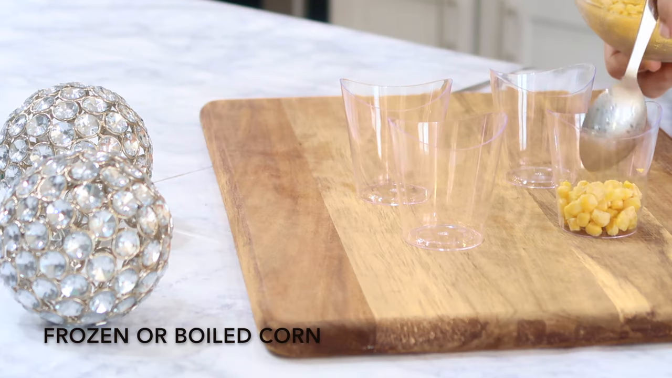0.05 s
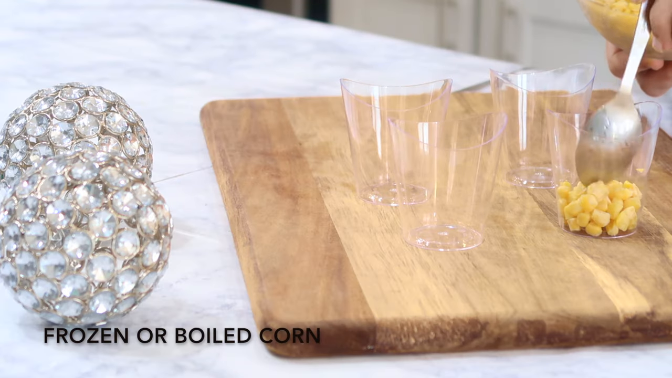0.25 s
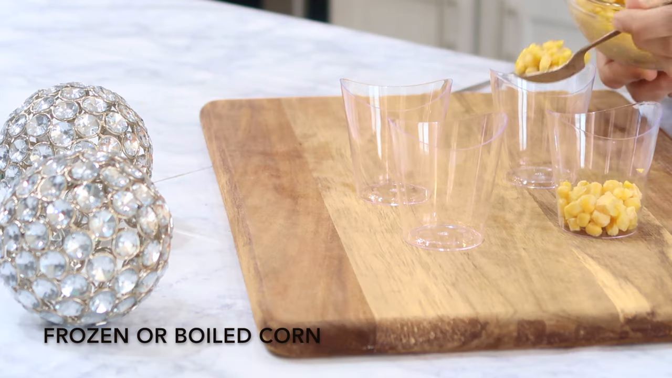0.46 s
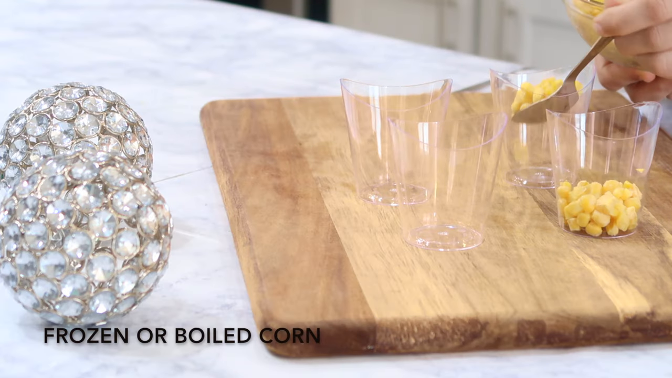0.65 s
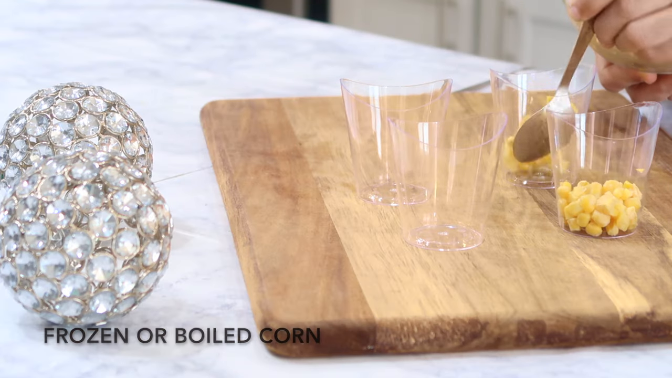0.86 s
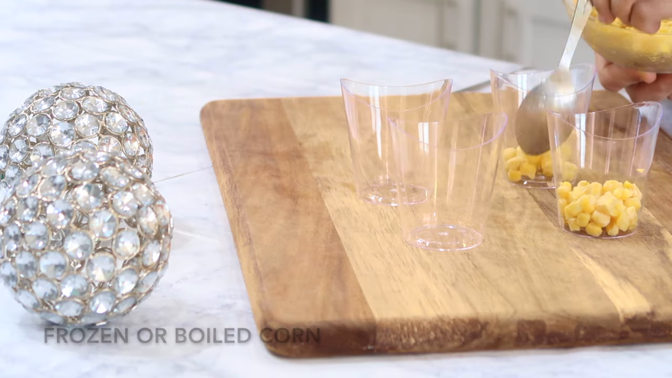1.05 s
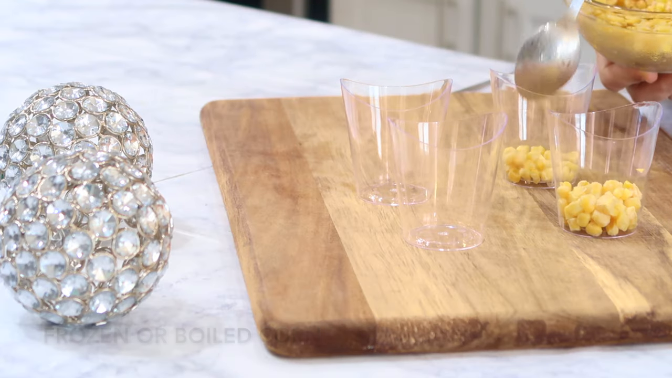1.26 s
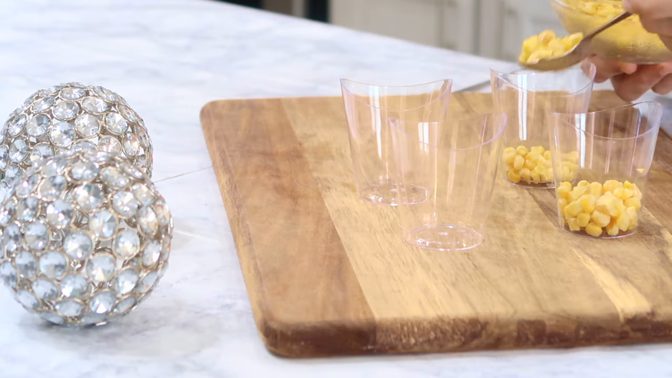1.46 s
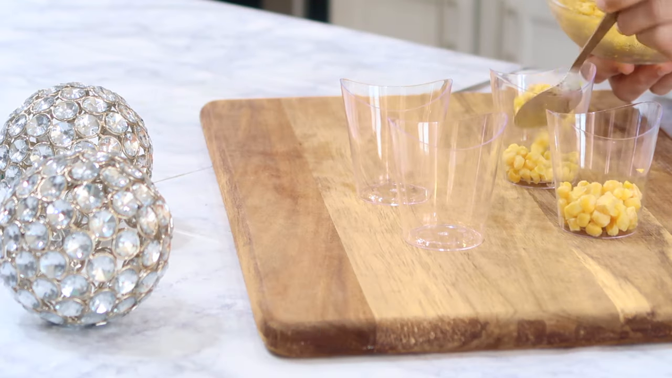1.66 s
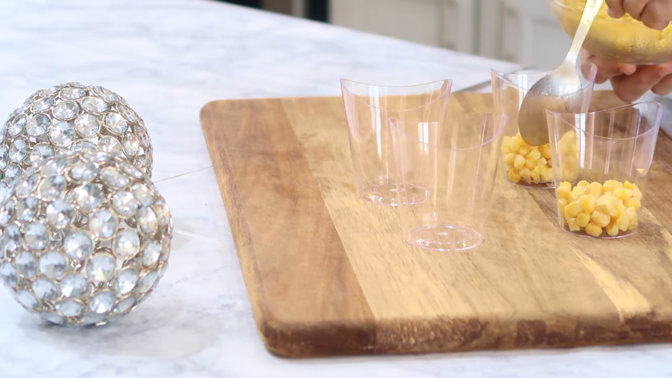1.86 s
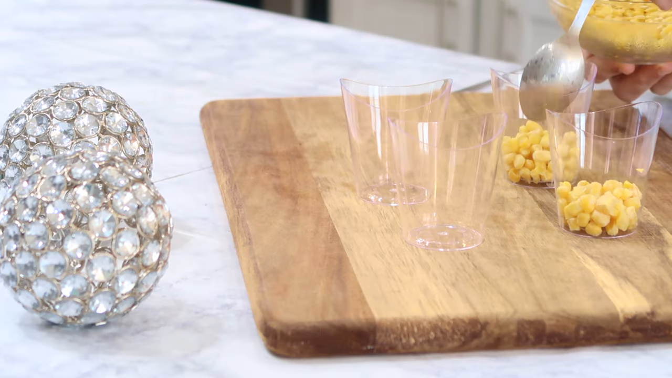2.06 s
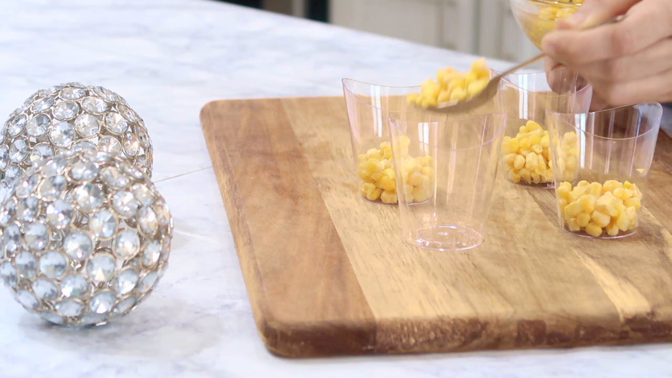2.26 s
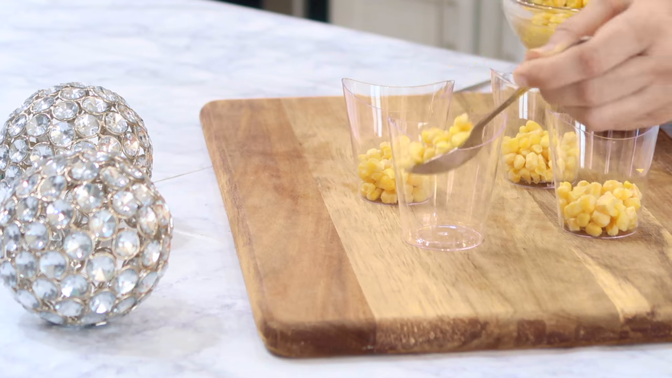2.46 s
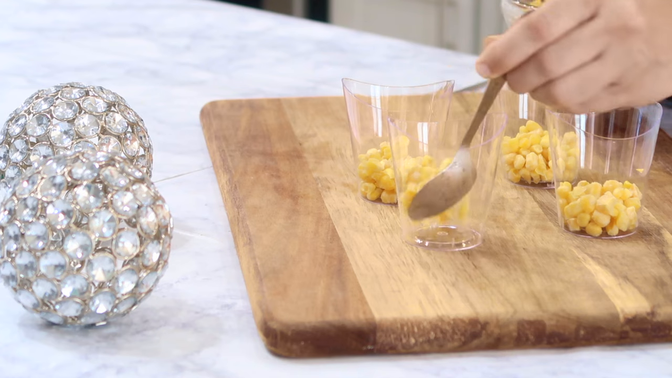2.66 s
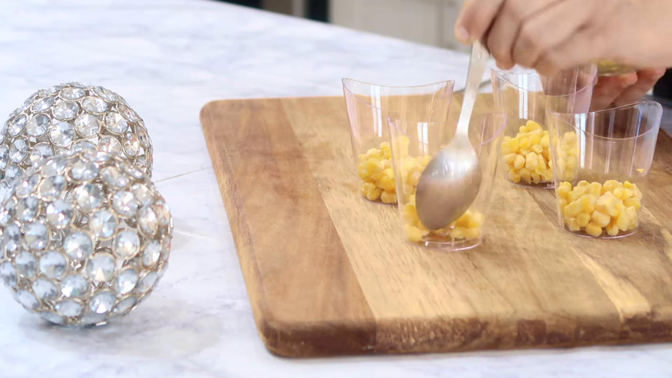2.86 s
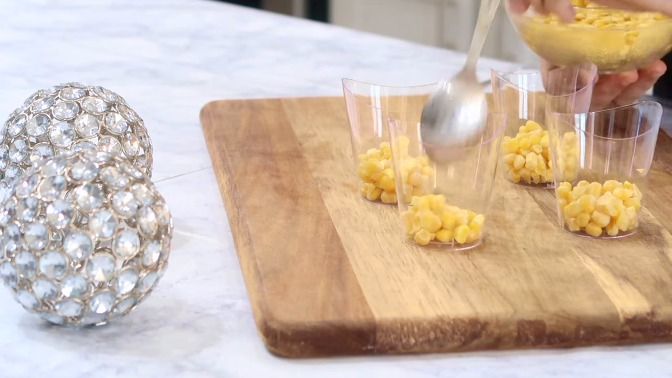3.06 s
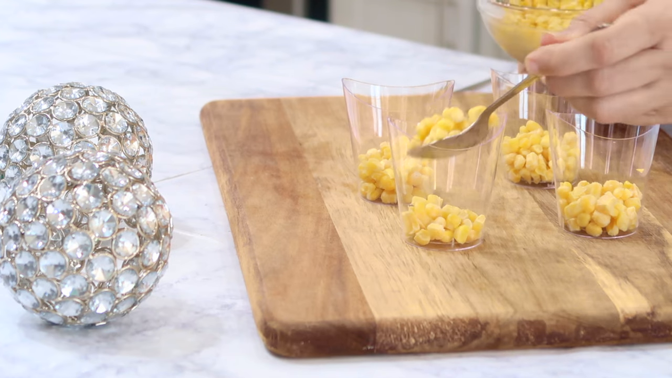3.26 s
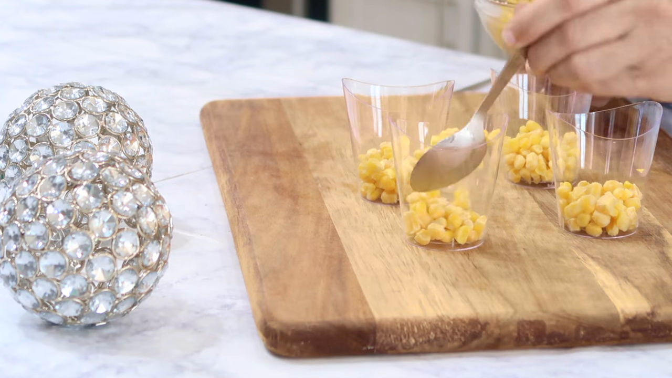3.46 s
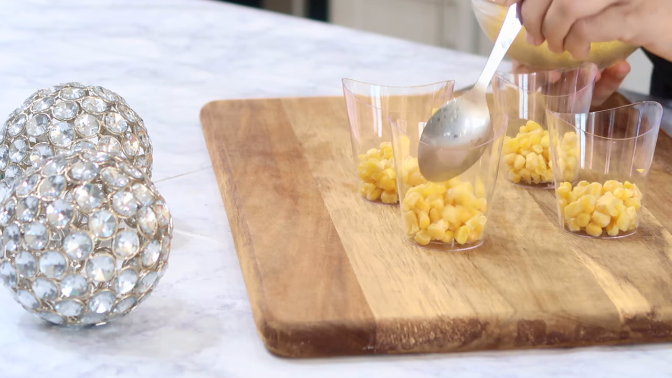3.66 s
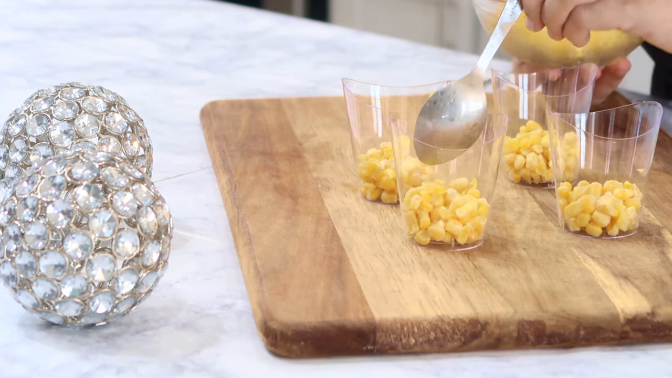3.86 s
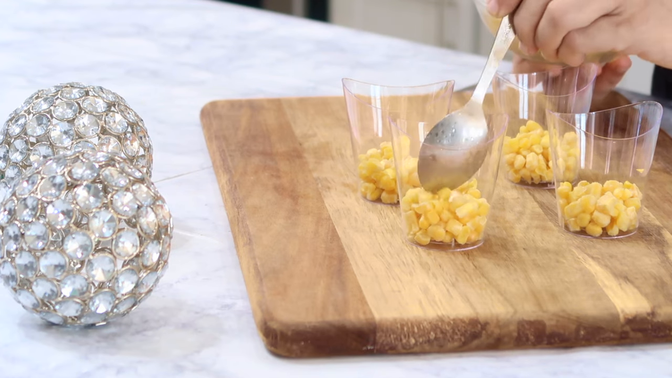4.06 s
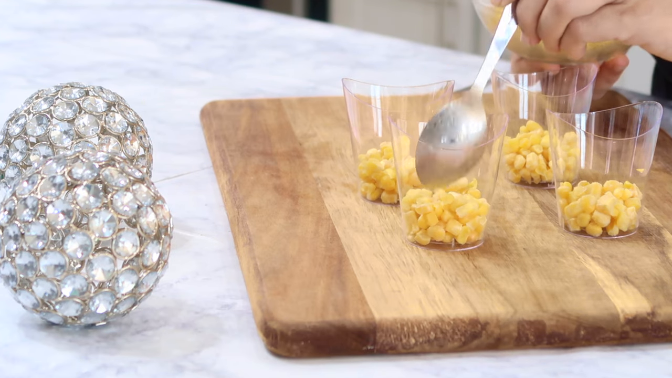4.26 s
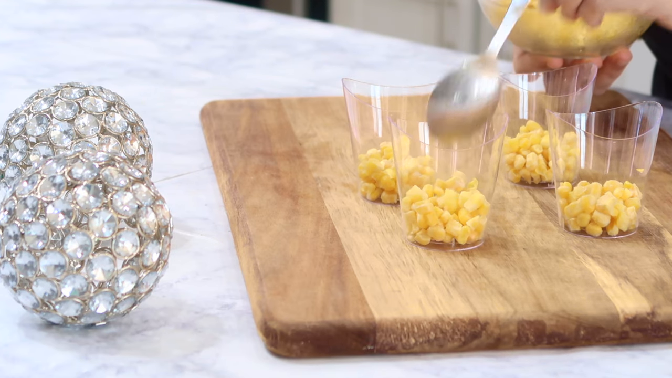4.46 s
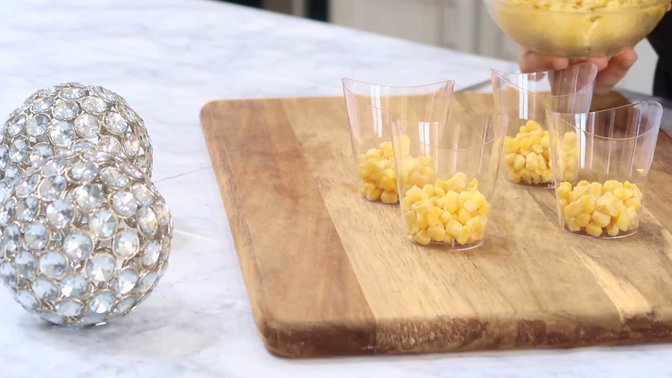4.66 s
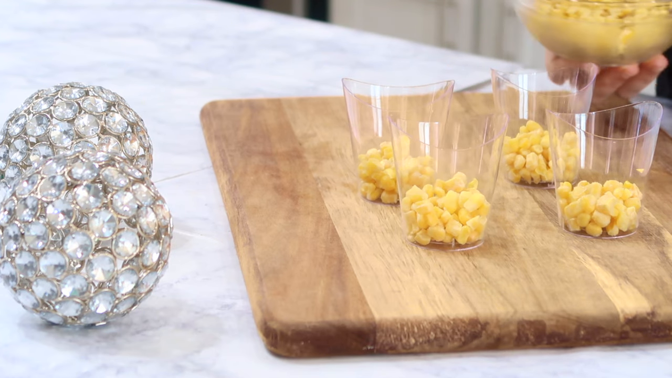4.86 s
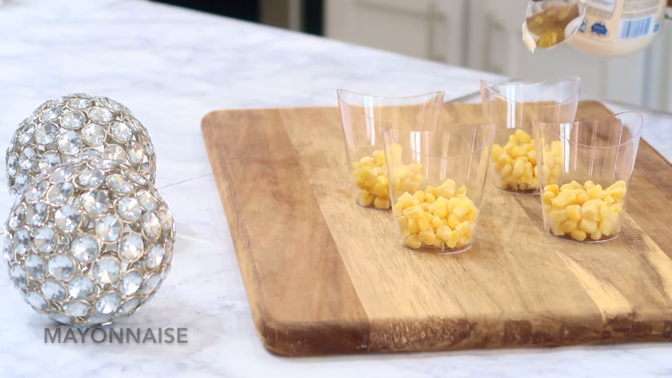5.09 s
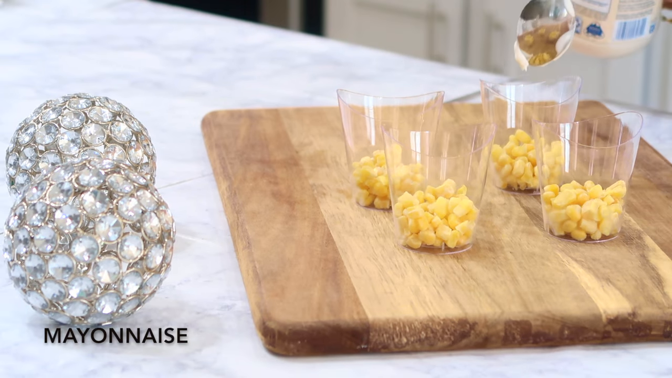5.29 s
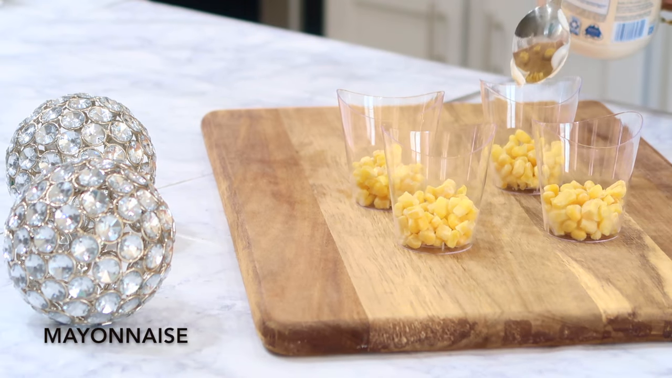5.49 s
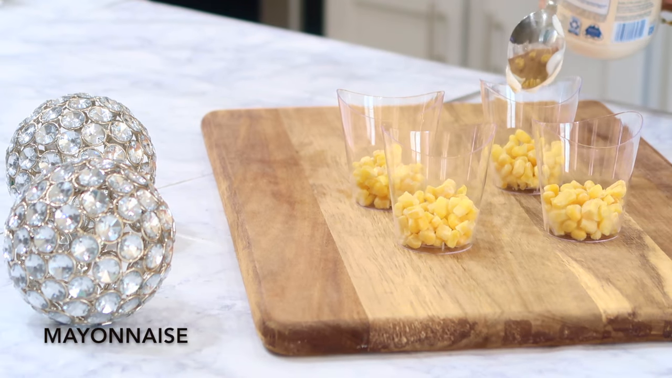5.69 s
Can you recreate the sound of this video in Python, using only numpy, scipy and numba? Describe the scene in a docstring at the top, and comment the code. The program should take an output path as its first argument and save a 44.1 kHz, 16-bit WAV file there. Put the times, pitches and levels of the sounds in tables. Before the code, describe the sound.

Close, dry stereo sound of a kitchen: corn drops into light plastic cups, the spoon knocking their sides, busiest around one second and just before three. Each cup rings briefly, duller as it fills. Soft hum and airy hiss lie beneath, with thin far bird whistles and faint chatter later. The corn stops at an edit, the room noise jumps up, and one clear bird sings until the end.

```python
"""Spoonfuls of corn kernels are tipped into thin plastic cups on a wooden board, in several edited shots;
kernels and spoon taps excite the resonances of air column, wall and rim, over kitchen noise, hum and a whine.
From 2.6 s far birds whistle as gliding sines in the middle of the image, then a distant chatter joins them.
Near 4.95 s the corn is cut off, the kitchen becomes louder, and a near bird sings slurs and a trill."""
import sys
import numpy as np
from scipy import signal
from scipy.fft import rfft, irfft
from scipy.io import wavfile
from scipy.ndimage import uniform_filter1d
from numba import njit

SR = 44100
rng = np.random.default_rng(int(sys.argv[2]) if len(sys.argv) > 2 else 0)


def generate_wav(sig):
    """Save sig (samples, or channels by samples) to the path in sys.argv[1] as 16-bit PCM at SR."""
    pcm = np.round(np.clip(np.atleast_2d(sig).T, -1, 1) * 32767).astype(np.int16)
    wavfile.write(sys.argv[1], SR, pcm)


def linear_from_db(decibels):
    """Turn decibels (scalar or array-like) into linear amplitude factors; 0 gives 1."""
    return 10 ** (np.asarray(decibels, float) / 20)


N = 252693
T = np.arange(N) / SR

# Levels in dB are relative drives: filters, gains and rooms further on still change them.

# Modes of a cup. Each row: pitch in Hz, width in Hz before damping by the corn, level in dB.
# The first is the air column, whose pitch each spoonful sets anew.
CUP_MODES = [(1170, 45, 0), (2420, 150, -11), (2890, 70, -10), (3290, 65, 2), (5280, 60, -6),
             (6420, 90, -7), (7460, 130, -13), (8200, 150, -15)]
# Spoonfuls. Each row: air column in Hz before and after filling, rim ring in Hz, damping by the corn as a factor.
SPOONFULS = [(1240, 1250, 4830, 1.3), (1095, 1290, 4950, 1), (1160, 1290, 4830, 2.8),
             (1150, 1250, 4740, 1.4), (1140, 1290, 5870, 2.3)]
# How freely sliding corn rings each cup. Each row: air column in dB, rim in dB.
SPOONFUL_DB = [(-2, -8.5), (-2, -2), (-1, -12.5), (-1.5, 2), (-4.5, -9)]
# The four parts: air column, wall, rim, tick. Each row: from in Hz, to in Hz, broad rattle between modes in dB.
PARTS = [(650, 1900, -21), (1500, 4400, -14.5), (4400, 6100, -19), (6100, 11500, -20)]
# Push of a tap. Entries: air column in dB, wall in dB, rim in dB, tick in dB.
BLOW_DB = [18.2, 12.3, 15.8, 15]
ENDS_S = [.63, 1.425, 2.62, 3.16, 4.95]  # ends of the spoonfuls; those at 1.425, 3.16 and 4.95 are edits

# Slides of kernels off the spoon. Each row: start in seconds, rise in seconds, peak in dB,
# fade in dB per second, treble against the wall in dB.
SLIDES = [(0, 0.0011, -61, 96, 7.5), (.66, 0.08, -76, 14, -18), (.845, 0.013, -48.5, 250, -22),
          (.885, 0.062, -47.5, 77, -0.5), (.97, 0.026, -53.5, 58.5, -8), (1.68, 0.046, -59.5, 63, 0),
          (2.649, 0.0036, -59.5, 300, -13), (2.679, 0.052, -47.5, 43, -16), (3.449, 0.0086, -58.5, 54, -3),
          (3.58, 0.032, -67, 40, 6), (4.205, 0.0058, -61.5, 303, -11)]
AIR_DB, AIR_GROWTH = -54.5, 0.54  # air column under a -50 dB slide; dB gained per dB of slide
RIM_DB, RIM_GROWTH = -10, 3.2  # rim against the flow in a -46 dB slide; dB gained per dB of slide
RIM_FADE_S = 0.13  # time constant of the rim drive, fading as the spoon sinks in
KERNEL_S = .0008  # time constant of a kernel's contact
PATCHY_DB, PATCHY_PER_S = 2, 90  # kernels come in clumps, anew for each part of the cup
FILL_S = 0.4  # from the first slide until the heap is built
WANDER, WANDER_PER_S = .006, 45  # detuning per unit of damping and heap growth; changes a second
BROAD_GROWTH = 0.2  # exponent by which the broad rattle grows with the heap

# Kernels on the bottom, ringing the air column. Each row: time in seconds, level in dB, tick in dB.
PLOPS = [(.0435, -47, -30), (.6942, -54, -25), (.702, -55, -30), (.712, -57, -25), (.7376, -45.5, -27),
         (.7705, -47, -30), (.775, -44, -24), (.796, -51, -30), (.875, -46, -30), (1.7463, -48.5, -2),
         (2.675, -29.5, -30), (2.7391, -31, -30), (2.7141, -36, -30), (2.808, -40, -30), (3.3658, -47, -35),
         (3.374, -52, -35), (3.404, -52, -35), (3.454, -51.5, 5), (3.468, -44, -25), (3.49, -38.5, -19),
         (3.679, -49.5, -19), (1.927, -54, -20)]
# Spoon on the rim. Each row: time in seconds, level in dB, tick in dB.
CLINKS = [(.778, -55, -25), (.9097, -34.5, -26), (2.7141, -49, -25), (2.745, -50, -21), (2.76, -50, -25),
          (.8485, -32.5, -15), (.8573, -35, -20), (.9265, -35, 4), (.9345, -37, 1), (.968, -38, -15),
          (.9901, -39.5, 7.5), (2.675, -30.5, -23), (2.6833, -34, -22), (2.7391, -31, -15),
          (3.0144, -43, 1.5), (3.5803, -42, 2.5)]
# Knocks on the wall. Each row: time in seconds, level in dB, tick in dB.
KNOCKS = [(.0937, -63, 15), (.6577, -48.5, -1), (.831, -44, -21), (.9035, -31.5, -30), (1.0135, -30, -20),
          (.951, -36, -15), (1.006, -36, -20), (1.054, -33, -10), (1.066, -38, -20), (1.2194, -36, -6.5),
          (1.6691, -50.5, -3), (1.6962, -47, -4), (1.708, -39, -5), (1.8333, -40, -10), (1.897, -47.5, -10),
          (2.6525, -40.5, -2.5), (2.7465, -26.5, -5.5), (2.928, -48, 2), (2.9503, -45, 2.5),
          (3.0344, -36.5, -27), (3.4592, -47, -16), (3.4983, -41.5, -28), (3.6085, -39, -8),
          (3.619, -41, -19), (3.7471, -35, -10), (3.7425, -42, -4), (3.756, -54.5, 14), (3.774, -44, -4),
          (3.781, -46, -13), (3.626, -38.5, -9), (3.68, -48, -20), (4.2112, -48, -20), (4.385, -63, 10.5),
          (.737, -53, -20), (.749, -46, -11), (.765, -56, -25), (.79, -57, -25), (1.0215, -30, -20),
          (1.717, -49, 0), (1.726, -48, -15), (2.6323, -56, -25), (2.7211, -40, -24), (2.753, -38, -4),
          (2.778, -33, -22), (2.858, -37, -22), (2.9965, -51, -14), (3.022, -46, -5), (3.044, -42, -20),
          (3.0708, -50, -15), (3.4905, -37, -17)]
# Shares of the push: air column in dB, wall in dB, rim in dB.
PLOP_DB, CLINK_DB, KNOCK_DB = (2, -8, -28), (-11, 3.2, 1), (-17.5, -0.4, -12.5)
BOUNCE_S = .0004, .0011  # a tap lands twice, edge then bowl: shortest and longest gap

# Spectrum of the kitchen air. Each row: frequency in Hz, relative density in dB per Hz.
KITCHEN_SPECTRUM = [(20, -23), (45, -14), (95, -7), (150, -11), (420, -12.5), (700, -20.5), (1250, -26.5),
                    (2700, -30.5), (9200, -45.5), (13000, -49.5), (15000, -40.5)]
# Likeness of left and right. Each row: frequency in Hz, correlation from 0 to 1.
LIKENESS = [(60, 1), (130, 0.83), (290, 0.46), (640, 0.48), (1410, 0.06), (3100, 0.19), (6820, 0.19),
            (15000, 0.037)]
# Hum lines. Each row: frequency in Hz, width of the wavering in Hz, level in dB before the common gain.
HUM = [(58.3, 6.6, -72.5), (120.5, 2.7, -61), (181, 4.3, -70.5), (473, 7.3, -74), (518.4, 12, -75)]
KITCHEN_DB = -61  # before the common gain
WHINE_HZ, WHINE_DB, THROB_HZ = 13007, -87, 30.0  # level before throb and common gain
LAST_SHOT_S, LAST_SHOT_DB = 4.962, 10.5  # the background steps up here, by so much

# Dull thuds of the cup on the board. Each row: time in seconds, level in dB.
THUDS = [(.7368, -41), (0.72, -48), (.0435, -66)]
THUD_HZ, THUD_S = 912, 0.0021  # pitch; time constant of decay

# Far birds, plain glides. Each row: start in seconds, length in seconds, from in Hz, to in Hz, peak in dB.
GLIDES = [(2.573, 0.083, 3970, 4200, -77), (3.96, 0.041, 2960, 2830, -62),
          (3.991, 0.033, 2610, 2110, -59.5), (4.189, 0.046, 2920, 2840, -63),
          (4.261, 0.04, 2785, 2970, -57), (4.265, 0.052, 2690, 2560, -63),
          (4.306, 0.026, 2540, 2200, -60.5), (3.198, 0.043, 3450, 3520, -72.5),
          (3.228, 0.045, 5350, 5100, -75), (3.32, .05, 1950, 2230, -74), (3.422, 0.03, 4270, 4380, -75),
          (4.465, 0.032, 1886, 2010, -62.5), (4.511, 0.058, 2014, 1946, -62),
          (4.82, 0.024, 2040, 2480, -64), (5.609, 0.095, 3720, 4730, -65), (5.695, 0.023, 3650, 3000, -63)]
# A far falling buzz. Its row: start in seconds, length in seconds, from in Hz, to in Hz, level in dB before the buzz.
SQUEAK = (3.24, 0.09, 4750, 2750, -68)
BUZZ_HZ, STUTTER_HZ = 520, 98
# Notes up and over. Each row: start in seconds, length in seconds, share at the top, top in Hz, peak in dB.
ARCHES = [(4.302, 0.12, 0.28, 3540, -65), (4.84, 0.11, 0.68, 3720, -65.5), (4.843, 0.102, .66, 5580, -77)]
ARCH_RISE, ARCH_FALL = .35, 0.27  # bend of the climb; share of pitch lost after the top
# Quick falls. Each row: start in seconds, first pitch in Hz, peak in dB.
CHIRPS = [(4.586, 2354, -61), (4.615, 2300, -59.5), (4.645, 2256, -57.5), (4.672, 2202, -60),
          (4.699, 2250, -62), (4.79, 2514, -58.5)]
CHIRP_S, CHIRP_FALL = 0.022, .72  # length; last pitch over first
FLUTTER_DB, FLUTTER_PER_S = 5, 85  # moving air and leaves break up the far whistles
NEAR_SWELL, FAR_SWELL, TRILL_SWELL = 0.74, 0.16, 0.27  # roundness of the swell, 0 = flat
LOUDEST = 0.63  # share of a note at its level peak

# Far chatter and its echoes. Each row: time in seconds, level in dB.
CHATTER_LEVEL = [(3.28, -76), (3.5, -71.5), (4.95, -68), (4.97, -66.5), (5.73, -65)]

# Near bird, notes that hold and then slide. Each row: start in seconds, length in seconds,
# from in Hz, to in Hz, peak in dB.
SLURS = [(4.946, 0.061, 2910, 2067, -35), (5.258, 0.054, 1857, 1746, -29),
         (5.483, 0.071, 2775, 2070, -29.5), (5.545, .032, 2064, 2480, -41),
         (5.569, 0.069, 2500, 2300, -31.5)]
SLIDE_S = .045  # slide that ends a near note
THROAT_HZ, THROAT_WIDTH_HZ = 2480, 520  # the near bird's slurs carry best here
# Near bird's trill. Its row: start in seconds, length in seconds, pitch in Hz, peak in dB.
TRILL = (5.003, .125, 2061.5, -35)
# Upward flicks in the trill. Each row: time in seconds, height in Hz.
FLICKS = [(5.019, 830), (5.047, 248), (5.074, 462), (5.1, 30)]
FLICK_UP_S, FLICK_DOWN_S, FLICK_DB_PER_KHZ = 0.00922, 0.00684, -2
CREEP_S, CREEP_HZ = 0.0254, 129.7  # the trill creeps up before each flick


@njit
def svf(x, hz, width):
    """Resonance: a state-variable band-pass with moving centre and width, of gain 1 at the centre."""
    y, b, l = np.empty(len(x)), 0., 0.
    for i in range(len(x)):
        g, k = np.tan(np.pi * hz[i] / SR), width[i] / hz[i]
        v = (b + g * (x[i] - l)) / (1 + g * (g + k))
        b, l, y[i] = 2 * v - b, l + 2 * g * v, k * v
    return y


def unit(x):
    """Normalisation: scale to rms 1."""
    return x / np.sqrt(np.mean(x ** 2))


def band(x, lo_hz, hi_hz):
    """Band limitation: a Butterworth band-pass."""
    return signal.sosfilt(signal.butter(2, [lo_hz, hi_hz], "bandpass", fs=SR, output="sos"), x)


def room(x, t60, damp_hz):
    """Reverberation: exponentially decaying noise of near unit energy, independent left and right."""
    t = np.arange(SR) / SR
    decay = 1000 ** (-t / t60) * np.minimum(t / t60 / 0.053, 1)
    tail = band(rng.standard_normal((2, SR)), 250, damp_hz) * decay
    return signal.fftconvolve(x[None], tail / np.sqrt(np.sum(tail[0] ** 2)))[:, :len(x)]


def walk(per_s, count, size):
    """Random modulation: rows of linearly joined random levels, per_s new ones a second."""
    knots = rng.standard_normal((count, 500))
    return 0.98 * np.array([np.interp(np.arange(size) / SR * per_s, np.arange(500), row) for row in knots])


def slides(rows, t):
    """Granular flow: each slide swells, then thins out exponentially, driving the four parts of the cup."""
    flow, treble, rim = 0, 0, 0
    for s, rise, db, fade_db, treble_db in rows:
        one = ((t - s) / rise).clip(0, 1) ** 2 * linear_from_db(db - fade_db * np.maximum(t - s - rise, 0))
        flow = flow + one
        treble = treble + linear_from_db(treble_db) * one
        sinking = np.exp(-np.maximum(t - s, 0) / RIM_FADE_S)
        rim = rim + linear_from_db(RIM_DB + RIM_GROWTH * (db + 46)) * one * sinking
    air = linear_from_db(AIR_DB) * (flow / linear_from_db(-50)) ** AIR_GROWTH
    return np.array([air, flow, rim + linear_from_db(0.5) * treble, linear_from_db(-22.0) * treble])


def kernels(per_s, spread_db, colour_db, rustle):
    """Shot noise: chance impacts of unequal size, each shared anew among the parts, over a fine rustle."""
    size = linear_from_db(spread_db * np.minimum(rng.exponential(size=N), 3)) * (rng.random(N) < per_s / SR)
    colour = linear_from_db(colour_db * rng.standard_normal((4, N)).clip(-2, 2))
    clicks = size * colour * rng.choice([-1, 1], N)
    t = np.arange(130) / SR
    contact = rng.standard_normal(130) * np.exp(-t / KERNEL_S)
    clicks = signal.fftconvolve(clicks, [contact])[:, :N]
    return unit(unit(clicks) + rustle * rng.standard_normal(N))


def taps():
    """Impulsive excitation: a double blow on each part, then some milliseconds of decaying chatter."""
    sharp, rattle = np.zeros((4, N + 900)), np.zeros((4, N + 900))
    t = np.arange(900) / SR
    softness = np.array([[.55], [.6], [.55], [.3]])  # the push is softest in the treble
    for rows, shares_db in (PLOPS, PLOP_DB), (CLINKS, CLINK_DB), (KNOCKS, KNOCK_DB):
        bursts = rng.standard_normal((len(rows), 900)) * np.exp(-t / 0.0084) * np.minimum(t / 0.00075, 1)
        gaps = rng.uniform(*BOUNCE_S, len(rows))
        for (s, db, tick_db), burst, gap in zip(rows, bursts, gaps):
            push = linear_from_db(db + np.array([*shares_db, tick_db]) + BLOW_DB)[:, None]
            at = int(s * SR)
            rattle[:, at:at + 900] += push * burst / np.linalg.norm(burst)
            sharp[:, [at, at + int(gap * SR)]] += softness * push
    return sharp[:, :N] + .5 * rattle[:, :N], rattle[:, :N]


def cup(push, rattle, air_hz, heap, rim_hz, damping):
    """Modal resonance: each part rings its modes over a broad rattle; the growing heap widens and weakens them."""
    out = 0
    # shifting contacts detune the modes
    detuning = walk(WANDER_PER_S, count=len(CUP_MODES) + 1, size=len(heap))
    drift = 1 + WANDER * damping * (heap - heap[0]) * detuning
    for row, rough, (lo, hi, broad_db) in zip(push, rattle, PARTS):
        ring = linear_from_db(broad_db) * (heap / 2) ** BROAD_GROWTH * band(rough, lo, hi)
        power = linear_from_db(broad_db) ** 2 * 2 * (hi - lo) / SR
        for k, (hz, width, db) in enumerate(CUP_MODES + [(rim_hz, 50, 2)]):
            if lo <= hz < hi:
                centre = air_hz if k == 0 else np.full(len(row), 1. * hz)
                wide = width * heap * (1.15 if k == 0 else damping)
                buried = heap if 4400 < hz < 6100 else np.sqrt(heap)  # the heap mutes the rim most
                ring = ring + linear_from_db(db) * svf(row, centre * drift[k], wide) / buried
                power += linear_from_db(db) ** 2 * np.pi * wide[0] / SR
        out = out + ring / np.sqrt(power)  # nominal response to white noise
    return out


def spoonfuls():
    """Excitation and resonance: flow and taps drive each cup in its room; a short fade ends each spoonful."""
    out = np.zeros((2, N))
    grains = kernels(per_s=900, spread_db=3.2, colour_db=4.5, rustle=.8)
    sharp, rattle = taps()
    starts = [0] + ENDS_S[:-1]
    for (empty_hz, full_hz, *wall), (air_db, rim_db), start, end in zip(SPOONFULS, SPOONFUL_DB, starts, ENDS_S):
        rows = [row for row in SLIDES if start <= row[0] < end]
        span = slice(int(start * SR), int(end * SR))
        t = T[span]
        patches = PATCHY_DB * walk(PATCHY_PER_S, count=4, size=len(t))
        clumps = linear_from_db(patches + [[air_db], [0], [rim_db], [0]])
        patter = slides(rows, t) * grains[:, span] * clumps + 1e-18
        first = rows[0][0] - FILL_S * (start == 0)  # the opening spoonful is already heaped
        filling = [first, first + FILL_S]
        air_hz = np.interp(t, filling, [empty_hz, full_hz])
        heap = np.interp(t, filling, [.6, 3.2])  # the growing heap blurs every ring
        # soft kernels rustle more than they ring
        rough = linear_from_db(2.5) * patter + linear_from_db(-4.5) * rattle[:, span]
        direct = linear_from_db(-2.5) * cup(patter + sharp[:, span], rough, air_hz, heap, *wall)
        mid = direct + linear_from_db(-9.0) * room(direct, 0.48, 10200)[0]
        # board and neighbouring cups scatter the treble differently to left and right
        side = linear_from_db(-1.5) * room(band(mid, 6400, 22000), 0.26, 21400)[0]
        side = side + linear_from_db(-21.0) * room(direct, 0.99, 13000)[1]
        edge = np.minimum((end - t) / 0.0071, 1)
        out[:, span] = np.array([mid + side, mid - side]) * linear_from_db([[-.2], [.2]]) * edge
    return out


def kitchen():
    """Stationary noise: coloured air, alike left and right mostly in the bass, wavering hum and a throbbing whine."""
    hz = np.log(np.arange(N // 2 + 1) * SR / N + 1)
    colour = linear_from_db(np.interp(hz, np.log([f for f, _ in KITCHEN_SPECTRUM]), [db for _, db in KITCHEN_SPECTRUM]))
    like = np.interp(hz, np.log([f for f, _ in LIKENESS]), [c for _, c in LIKENESS]).clip(0, .99)
    side_gain = np.sqrt((1 - like) / (1 + like))
    mid, side = rfft(rng.standard_normal((2, N))) * colour * [np.ones(len(hz)), side_gain]
    mid, side = irfft(mid, N), irfft(side, N)
    air = np.array([mid + side, mid - side]) / np.std(mid) * linear_from_db(KITCHEN_DB)
    hum = 0
    for f, width, db in HUM:
        waver = unit(svf(rng.standard_normal(N), np.full(N, 1. * f), np.full(N, 1. * width)))
        hum = hum + linear_from_db(db) * (np.sin(2 * np.pi * f * T) + 0.25 * waver)
    throb = 1 + 0.52 * np.cos(2 * np.pi * THROB_HZ * (T - .003))
    whine = linear_from_db(WHINE_DB) * throb * np.sin(2 * np.pi * WHINE_HZ * T)
    step = ((T - LAST_SHOT_S) / 0.011 + .5).clip(0, 1)
    return (air + hum + whine) * linear_from_db(-0.38 + LAST_SHOT_DB * step)


def thuds():
    """Damped oscillation: a few dying cycles at the board, with a faint room tail."""
    out, t = np.zeros(N), np.arange(600) / SR
    envelope = np.e * t / 0.00062 / (1 + t / 0.00058) * np.exp(-t / THUD_S)
    for s, db in THUDS:
        at = int(s * SR)
        out[at:at + 600] += linear_from_db(db) * envelope * np.sin(2 * np.pi * THUD_HZ * t)
    return out + linear_from_db(-13.0) * room(out, 0.55, 3000)[0]


def whistle(s, length, db, roundness, pitch):
    """Frequency modulation: a sine of pitch(u) in Hz with a rounded swell over its share u from 0 to 1."""
    out, u = np.zeros(N), np.linspace(0, 1, int(length * SR))
    swell = np.sin(np.pi / 2 * np.interp(u, [0, LOUDEST, 1], [0, 1, 2])).clip(0) ** roundness
    glide = uniform_filter1d(pitch(u), size=90)
    out[int(s * SR):int(s * SR) + len(u)] = linear_from_db(db) * swell * np.sin(2 * np.pi * np.cumsum(glide) / SR)
    return out


def straight(s, length, from_hz, to_hz, db):
    """Linear glide: a far whistle whose frequency changes at a constant rate."""
    return whistle(s, length, db, FAR_SWELL, lambda u: from_hz + (to_hz - from_hz) * u)


def arch(u, top):
    """Parabolic glide: pitch relative to its top as the note climbs and then falls."""
    bend = np.where(u < top, ARCH_RISE, ARCH_FALL / (1 - top) ** 2)
    return 1 - bend * (u - top) ** 2


def far_echo(x):
    """Reverberation: a long and a short tail behind the far birds."""
    return linear_from_db(-10.0) * room(x, 1.0, 6200)[0] + linear_from_db(-11.0) * room(x, 0.29, 6000)[0]


def far_birds():
    """Propagation: moving air and leaves modulate the far whistles, and two reverberant tails follow them."""
    glides = sum(straight(*row) for row in GLIDES)
    others = sum(whistle(s, n, db, TRILL_SWELL, lambda u: hz * arch(u, top)) for s, n, top, hz, db in ARCHES)
    others += sum(straight(s, CHIRP_S, hz, hz * CHIRP_FALL, db) for s, hz, db in CHIRPS)
    buzz = (1 + np.cos(2 * np.pi * BUZZ_HZ * T)) * np.cos(np.pi * STUTTER_HZ * T) ** 2
    others += buzz * straight(*SQUEAK)
    glide_flutter = linear_from_db(FLUTTER_DB * walk(FLUTTER_PER_S, count=1, size=N)[0] - 0.5)
    other_flutter = linear_from_db(2.1 * walk(FLUTTER_PER_S, count=1, size=N)[0])
    far = glides * glide_flutter + others * other_flutter
    before = T < LAST_SHOT_S  # the edit cuts the far echoes off
    return far + before * far_echo(before * far) + far_echo(~before * far)


def chatter():
    """Superposition: many short falling chirps, smeared by reverberation as by distance."""
    out, t = np.zeros(N + 2000), np.arange(2000) / SR
    for s, (height, size) in zip(np.arange(3, 5.73, .005), rng.random((600, 2))):
        hz = (2200 + 3600 * height ** 3) * (1 - 5.0 * t)
        at = int(s * SR)
        out[at:at + 2000] += size * np.hanning(2000) * np.sin(2 * np.pi * np.cumsum(hz) / SR)
    far = room(out[:N], 0.44, 4500)[0]
    s, db = np.transpose(CHATTER_LEVEL)
    return far / np.std(far[int(s[0] * SR):]) * linear_from_db(np.interp(T, s, db, left=-120))


def slurs():
    """Throat resonance: notes hold, then slide along a half cosine, through one band-pass."""
    def ease(left_s):
        return .5 + .5 * np.cos(np.pi * (left_s / SLIDE_S).clip(0, 1))
    notes = sum(whistle(s, n, db, NEAR_SWELL, lambda u: a + (b - a) * ease(n * (1 - u)))
                for s, n, a, b, db in SLURS)
    return svf(notes, np.full(N, 1. * THROAT_HZ), np.full(N, 1. * THROAT_WIDTH_HZ))


def trill():
    """Frequency modulation: one note creeps up and flicks, and is softer where a flick is high."""
    flicks = sum(np.interp(T, [s - FLICK_UP_S, s, s + FLICK_DOWN_S], [0, 1, 0]) ** 1.394 * hz for s, hz in FLICKS)
    creep = sum(np.interp(T, [s - CREEP_S, s, s + FLICK_DOWN_S], [0, CREEP_HZ, 0]) for s, _ in FLICKS)
    s, n, hz, db = TRILL
    note = whistle(s, n, db, TRILL_SWELL, lambda u: hz + np.interp(s + n * u, T, flicks + creep))
    return note * linear_from_db(FLICK_DB_PER_KHZ * flicks / 1000)


def near_bird():
    """Interference: a wall returns the near bird inverted and delayed, so its glides beat; a tail follows."""
    song = slurs() + trill()
    song = 0.53 * (song - 0.63 * np.roll(song, int(0.002943 * SR)))
    return song + linear_from_db(-15.5) * room(song, 1.0, 6200)[0]


def scene():
    """Superposition: cups, kitchen and birds together."""
    return spoonfuls() + kitchen() + thuds() + far_birds() + chatter() + near_bird()


def low_pass(x):
    """Removes everything above the highest recorded frequency."""
    return signal.sosfilt(signal.butter(12, 15850, fs=SR, output="sos"), x)


def record(dry):
    """Low-pass filtering: the treble falls away steeply above 14.5 kHz."""
    dull = signal.sosfilt(signal.butter(8, 14500, fs=SR, output="sos"), dry)
    return low_pass(dull)


dry = scene()
out = record(dry)
generate_wav(out)
```